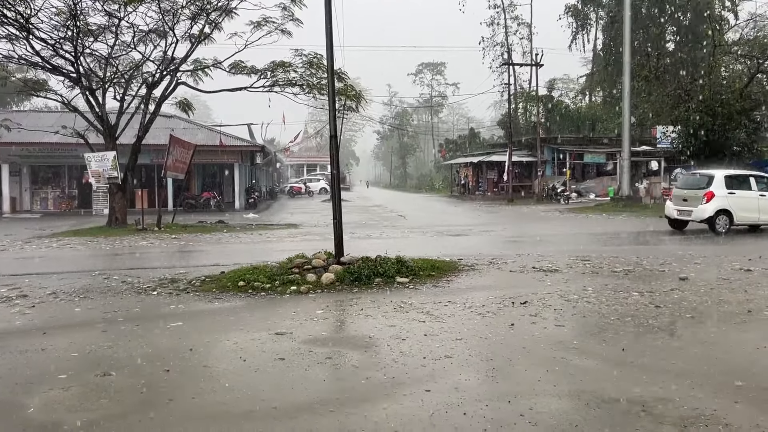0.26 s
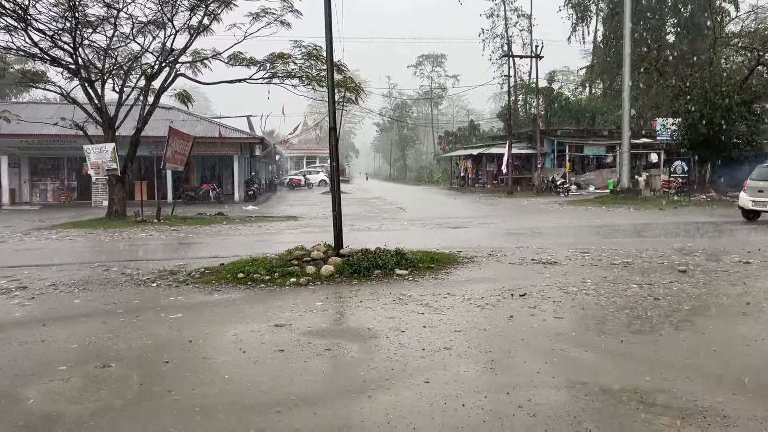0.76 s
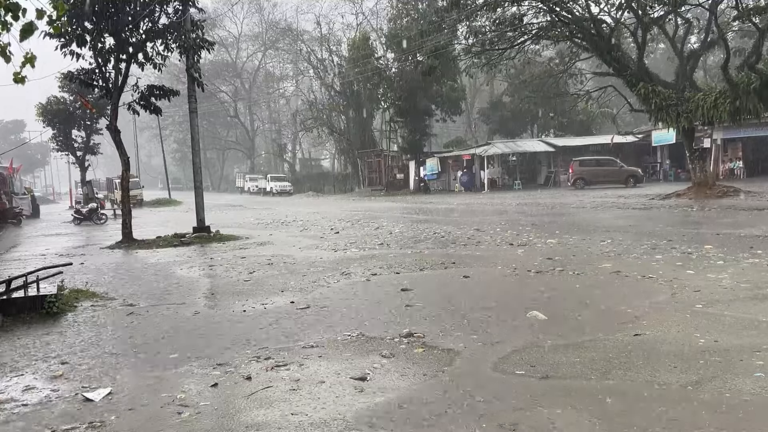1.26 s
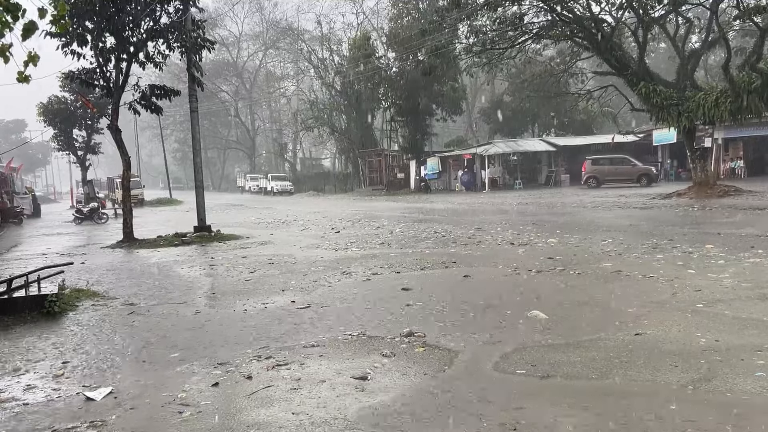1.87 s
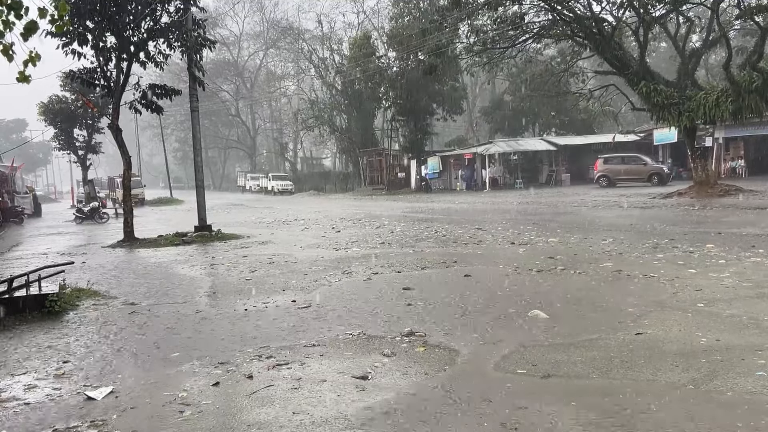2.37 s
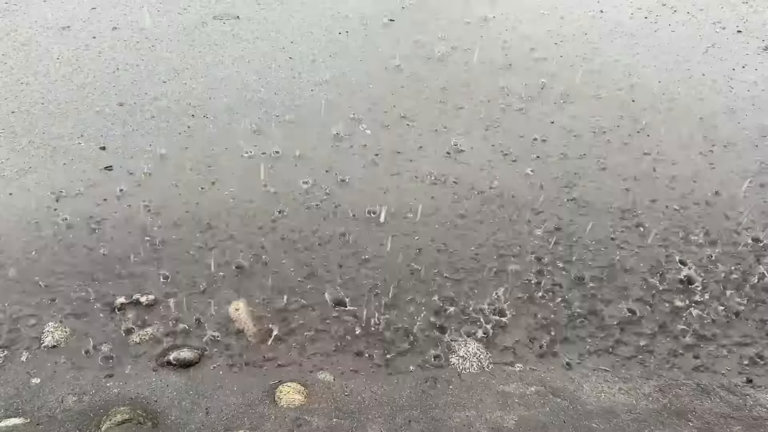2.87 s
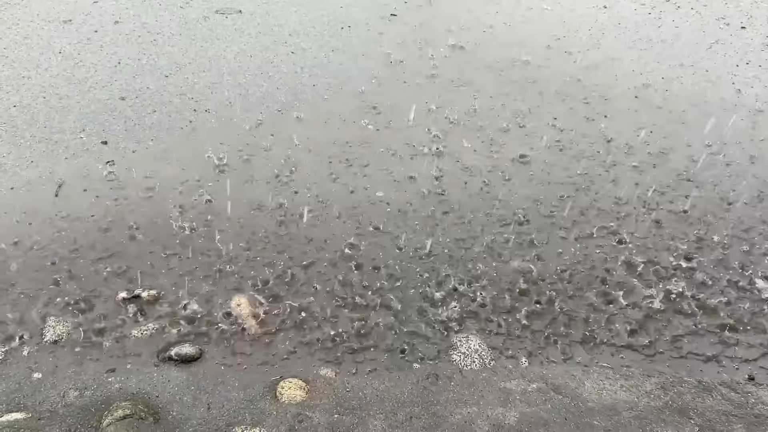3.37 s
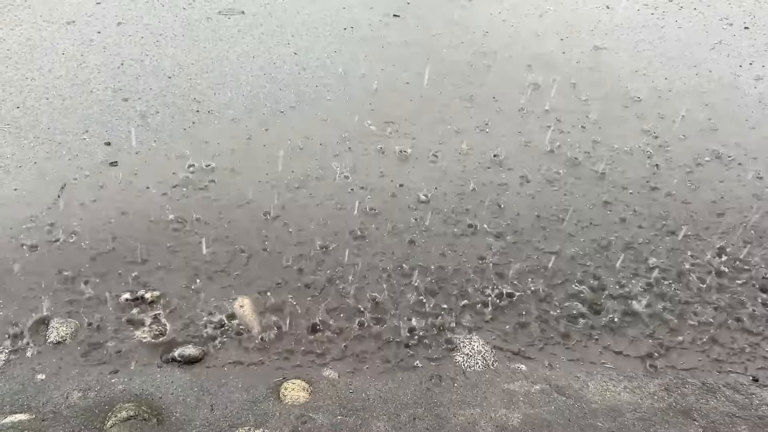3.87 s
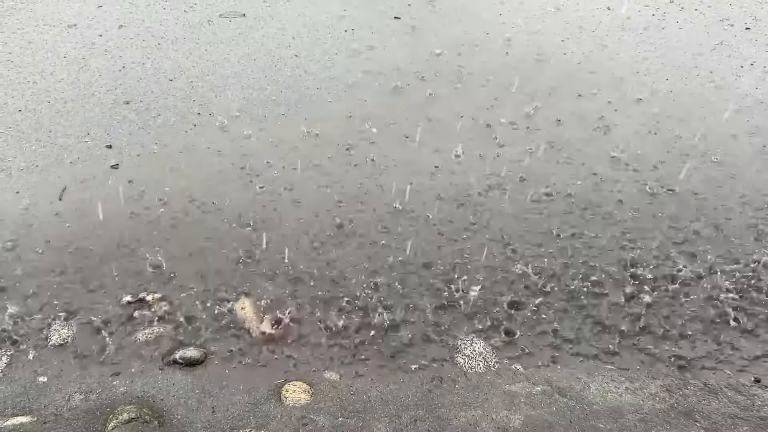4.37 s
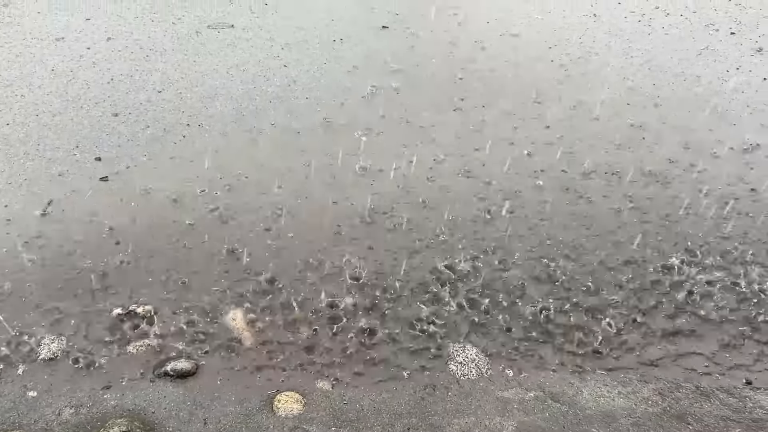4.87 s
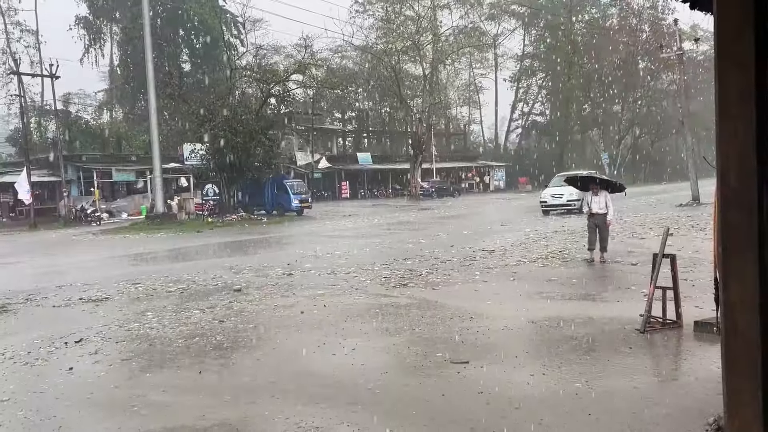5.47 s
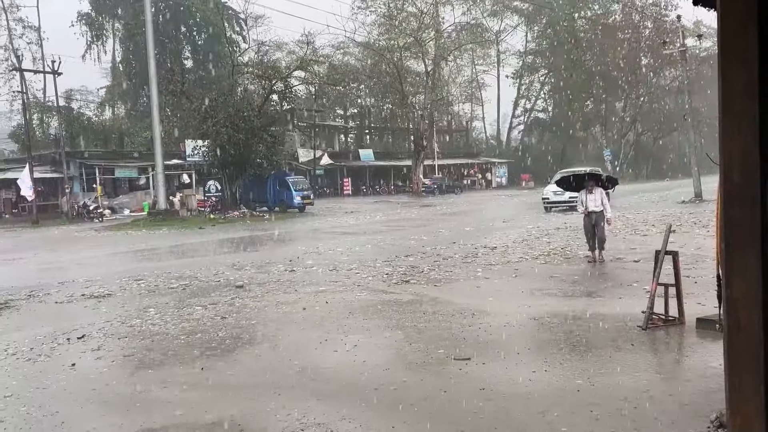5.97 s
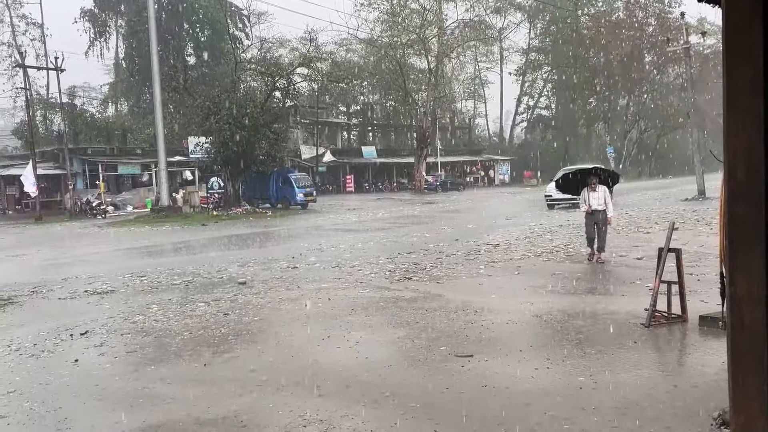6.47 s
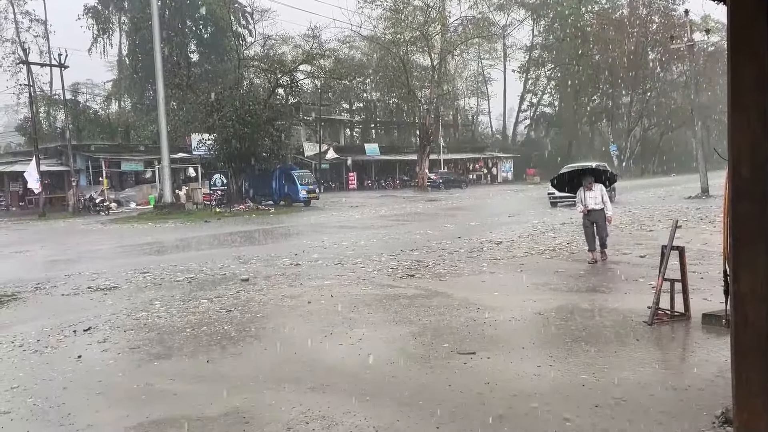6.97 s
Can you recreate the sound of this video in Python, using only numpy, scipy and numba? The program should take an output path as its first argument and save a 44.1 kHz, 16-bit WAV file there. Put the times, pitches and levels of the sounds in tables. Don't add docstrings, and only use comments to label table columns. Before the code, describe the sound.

Heavy rain pours steadily onto a flooded road, with bubbling puddles, sharp drop ticks, low wind thumps and a faint late brake squeal.

```python
import sys
import numpy as np
from scipy import signal
from scipy.fft import rfft, irfft
from scipy.io import wavfile
from scipy.ndimage import uniform_filter1d, map_coordinates
from numba import njit

SR = 44100
rng = np.random.default_rng(int(sys.argv[2]) if len(sys.argv) > 2 else 0)


def field_ratio(decibels):
    return 10 ** (np.asarray(decibels, dtype=float) / 20)


def bounce(signal):
    frames = np.transpose(np.atleast_2d(signal))
    limited = np.clip(frames, -1, 1)
    pcm = np.round(limited * 32767).astype(np.int16)
    wavfile.write(sys.argv[1], SR, pcm)


N = 317520
TIME_S, BIN_HZ = np.arange(N) / SR, np.arange(N // 2 + 1) * SR / N

# [t/s, level/dB]
DOWNPOUR = [(0.0, -22), (0.87, -23), (0.93, -22), (1.8, -23.5), (2.89, -23.5), (2.95, -22), (3.19, -21),
            (3.65, -21), (3.85, -22.5), (4.43, -23), (4.78, -21), (4.94, -22), (5.0, -25), (5.46, -23),
            (5.83, -23), (6.37, -21), (6.74, -22), (7.2, -23)]
# [f/Hz, density/dB per Hz]
WASH_COLOUR = [(70, -16), (140, 0), (230, -1), (420, 1.5), (600, -2), (860, 1), (1200, -1), (1650, -4),
               (2400, -9.8), (4800, -14.5), (7000, -18.5), (11500, -19.5), (15200, -20.5), (15900, -20.5)]
SHOT_STARTS_S = [
    .8784,
    2.8983,
    4.9465,
]
# [low roar/dB, spray/dB, extra rain on the right/dB, breeze/dB, puddle bubbles/dB]
SHOTS = [
    (0.2, 0.1, -1.4, -33, 0.1),
    (0.3, -0.4, -0.8, -32, -0.6),
    (0.1, 0.1, -0.7, -33, 0.9),
    (-0.8, 0.1, -1.3, -37.5, -0.3),
]
# [f/Hz, density/dB per Hz]
WIND_COLOUR = [(15, -42), (25, -28), (48, -1), (70, 1.5), (110, -3.5), (200, -15.5), (400, -31.5)]
# [t/s, peak/dB, f/Hz, gust fall of 20 dB/s]
KNOCKS = [(0.2, -24, 60, .1), (0.35, -24, 55, .15), (0.51, -23, 59.2, .1), (0.69, -25, 60, .4),
          (0.947, -24, 91.5, .2), (1.06, -24, 65, .2), (1.12, -18, 66, .2), (1.246, -20, 83.4, .1),
          (1.458, -17, 75.4, .17), (1.608, -14, 74.0, .5), (1.934, -14.5, 75.4, .1),
          (2.168, -15.5, 91.5, .08), (2.33, -24, 70, .6), (2.698, -15.5, 83.4, .25), (2.865, -16, 67.3, .2),
          (3.035, -21, 99.6, .2), (3.035, -16, 59.2, .4), (3.518, -19, 94.2, .25), (3.696, -15, 56.5, .14),
          (3.856, -21, 53.8, .13), (4.066, -16, 78.1, .25), (4.2, -15, 66, .15), (4.606, -21, 88.8, .25),
          (4.84, -15, 140, .03), (4.853, -10, 75, .03), (5.36, -29, 70, .1), (5.65, -28, 60, .15),
          (5.874, -27, 56.5, .2), (6.25, -31, 78.1, .4), (6.55, -25, 53.8, .5), (6.729, -17, 56.5, .15),
          (6.834, -26, 70.4, .2), (6.95, -27, 75, .5)]
# [t/s, peak/dB, f/Hz]
PLOPS = [(0.008, -13, 4200), (0.1032, -17, 2780), (0.1271, -16, 4020), (0.168, -16, 4300),
         (0.28, -16, 5000), (0.386, -15, 4650), (0.1605, -13, 4080), (0.7692, -18, 2500),
         (0.8385, -15, 4490), (0.8734, -18, 2740), (0.8999, -24, 2520), (0.9093, -19, 2790),
         (1.8597, -12, 3940), (1.942, -17, 2650), (2.0742, -18, 2300), (2.0882, -18, 3190),
         (2.2223, -18, 4180), (2.4803, -18, 2990), (2.5326, -16, 3040), (2.6688, -21, 4600),
         (2.829, -17, 2520), (2.9248, -21, 2510), (2.9647, -15, 2570), (3.0195, -15, 3240),
         (3.1068, -18, 3510), (3.1502, -18, 3980), (3.277, -17, 3630), (3.3199, -18, 3590),
         (3.3982, -17, 2770), (3.4291, -16, 2780), (3.5159, -17, 2320), (3.6636, -16, 3120),
         (3.7873, -18, 2830), (3.9903, -18, 2300), (4.1654, -18, 2540), (4.2143, -18, 2470),
         (4.3086, -16, 2420), (4.5291, -16, 3290), (4.6159, -16, 2850), (4.6833, -19, 2300),
         (4.7047, -16, 4790), (4.9257, -17, 3030), (4.9741, -21, 2820), (4.9921, -19, 2310),
         (5.1502, -19, 2320), (5.1976, -17, 3550), (5.2305, -15, 4550), (5.3388, -15, 4160),
         (5.5707, -16, 3040), (5.7813, -18, 2700), (5.8017, -18, 3920), (5.8346, -18, 2560),
         (6.0516, -17, 4760), (6.11, -17, 2510), (6.3165, -14, 3080), (6.6568, -17, 2450),
         (6.7501, -18, 2810), (7.0319, -19, 3190)]
# [t/s, peak/dB, f/Hz]
BIG_BUBBLES = [(0.21, -11, 837), (0.394, -12, 877), (0.5, -13, 980), (0.686, -11, 756), (0.854, -9, 1090),
               (0.896, -16, 681), (0.925, -13, 1280), (1.27, -11, 1240), (1.292, -13, 1500),
               (1.54, -11, 1210), (2.193, -12, 802), (2.223, -11, 1120), (2.272, -12, 1150),
               (2.689, -13, 926), (2.926, -14, 974), (3.105, -9, 1000), (3.311, -10, 1570),
               (3.337, -8, 1050), (3.386, -11, 867), (3.446, -10, 770), (3.569, -8, 1050),
               (3.593, -10, 641), (3.725, -11, 1020), (4.107, -11, 1530), (4.127, -11, 888),
               (4.434, -12, 1080), (4.599, -12, 1140), (4.752, -10, 886), (4.773, -10, 945),
               (4.795, -9, 738), (4.925, -9, 845), (5.238, -13, 875), (5.431, -12, 945), (5.486, -11, 606),
               (5.779, -11, 1010), (5.892, -12, 724), (5.935, -10, 985), (6.01, -11, 977),
               (6.054, -12, 939), (6.086, -12, 842), (6.485, -11, 834), (6.57, -12, 875),
               (6.801, -14, 1050), (6.989, -10, 1010), (7.024, -11, 781)]
# [t/s, peak/dB, f/Hz]
MID_BUBBLES = [(0.157, -17, 1610), (0.5596, -16, 2120), (0.7906, -19, 1550), (0.9198, -21, 1600),
               (0.9557, -18, 1680), (1.1463, -19, 1710), (1.1727, -19, 1720), (1.2585, -17, 2070),
               (1.286, -20, 1990), (1.3179, -17, 1760), (1.3718, -18, 1690), (1.5369, -19, 1930),
               (1.6407, -20, 1880), (1.8981, -19, 1640), (2.0108, -19, 1680), (2.0353, -19, 1570),
               (2.0777, -19, 1570), (2.1939, -20, 1650), (2.5875, -20, 1660), (2.7935, -18, 1730),
               (2.9302, -21, 1550), (2.9612, -17, 1780), (3.0854, -16, 1660), (3.1672, -17, 1870),
               (3.4151, -18, 1620), (3.473, -17, 1590), (3.5428, -18, 1810), (3.9908, -17, 2140),
               (4.2093, -21, 1770), (4.6613, -16, 1560), (4.7057, -17, 1630), (4.814, -15, 1690),
               (4.9616, -22, 1550), (5.8167, -19, 1630), (5.8561, -19, 1710), (5.895, -18, 1800),
               (5.9818, -16, 1570), (6.0307, -18, 1820), (6.2447, -16, 1570), (6.3295, -16, 1560),
               (6.4418, -19, 1630), (6.544, -18, 1940), (6.6767, -16, 1670), (6.9686, -16, 1620),
               (7.1207, -20, 1840)]
# [t/s, peak/dB, f/Hz]
SMALL_BUBBLES = [(0.3132, -23, 5110), (0.5551, -24, 4820), (0.7936, -23, 4710), (0.9009, -27, 5190),
                 (1.034, -26, 4990), (1.0635, -20, 5000), (1.0839, -24, 4930), (1.3673, -26, 6320),
                 (1.5818, -25, 4810), (1.6686, -24, 6270), (1.8597, -19, 4840), (1.942, -23, 4840),
                 (2.0083, -18, 5860), (2.368, -26, 4780), (2.5331, -22, 5180), (2.6015, -21, 4770),
                 (2.6688, -18, 4940), (2.7911, -22, 4880), (2.829, -23, 5030), (2.8789, -22, 4830),
                 (2.9208, -26, 5120), (3.1477, -20, 4990), (3.2765, -24, 5090), (3.5533, -23, 6060),
                 (3.9908, -23, 6310), (4.0926, -22, 4720), (4.2772, -25, 4790), (4.372, -23, 5170),
                 (4.7047, -22, 4790), (4.7875, -23, 5070), (4.9781, -26, 4940), (5.0943, -24, 4900),
                 (5.1791, -25, 5070), (5.23, -19, 4740), (5.7414, -20, 5430), (5.7813, -23, 6340),
                 (5.8017, -24, 4850), (5.9668, -24, 4830), (6.0521, -22, 4760), (6.0871, -22, 5060),
                 (6.1155, -24, 4910), (6.3165, -22, 4950), (6.3779, -25, 6360), (6.6174, -24, 4730)]
# [t/s, peak/dB, f/Hz]
TICKS = [(0.1082, -17, 7070), (0.404, -17, 11800), (0.8974, -27, 12400), (0.9073, -22, 6770),
         (1.0635, -13, 7260), (1.1513, -15, 6530), (1.2027, -19, 6820), (1.2296, -11, 6570),
         (1.3039, -18, 7460), (1.3199, -18, 7330), (1.6746, -20, 6520), (2.0078, -14, 6540),
         (2.2298, -19, 6940), (2.5037, -14, 7210), (2.7706, -17, 7400), (2.9178, -25, 11500),
         (2.9297, -20, 7400), (2.9746, -14, 7290), (3.0794, -15, 6980), (3.1477, -13, 7460),
         (3.3179, -14, 6700), (3.3568, -18, 8110), (3.3977, -13, 12700), (3.467, -14, 12900),
         (3.6082, -16, 13700), (3.6391, -19, 7060), (3.8467, -11, 13400), (3.8631, -13, 13100),
         (3.9, -14, 7060), (4.0083, -11, 7650), (4.0627, -12, 11500), (4.1679, -11, 12700),
         (4.4358, -18, 13200), (4.5166, -19, 7390), (4.56, -16, 7060), (4.6029, -17, 8310),
         (4.6508, -14, 6980), (4.7406, -18, 7330), (4.8319, -14, 6610), (4.8638, -13, 13000),
         (5.0225, -20, 6600), (5.0774, -16, 7960), (5.2195, -19, 6540), (5.2385, -19, 6650),
         (5.3448, -16, 6800), (5.5169, -12, 12600), (5.6466, -15, 12300), (5.6905, -16, 7180),
         (5.7414, -14, 6730), (5.7808, -19, 7160), (5.8726, -18, 7170), (5.902, -16, 12600),
         (6.116, -19, 7850), (6.2986, -15, 6520), (6.3485, -13, 7010), (6.3784, -18, 7170),
         (6.4418, -18, 6540), (6.5595, -16, 7250), (6.6912, -16, 8400), (6.7186, -15, 8010)]
# [t/s, peak/dB, f/Hz, length/cycles]
DRIPS = [
    (1.1522, -9, 14600, 8),
    (1.1522, -15, 7800, 6),
    (2.0088, -10, 14400, 12),
    (2.0088, -8, 11900, 10),
    (6.874, -11, 9000, 2),
    (7.1848, -11, 11000, 3),
]
# [t/s, f/Hz, level/dB]
SQUEAL = [
    (6.645, 8700, -44),
    (6.66, 8700, -32),
    (6.695, 8700, -30),
    (6.725, 8050, -31),
    (6.76, 7150, -33),
    (6.785, 6600, -35),
    (6.85, 6400, -32),
    (6.96, 6400, -34),
    (7.2, 6200, -32.5),
]
# [f/Hz, width/Hz, gain/dB]
DISC_MODES = [(8850, 60, 7), (8570, 60, 6), (8050, 55, 10), (7620, 80, 1), (7200, 55, 9), (6800, 60, 6),
              (6490, 45, 10), (6230, 45, 9), (5850, 60, 7), (5550, 70, 4)]
# [t/s, peak/dB, f/Hz, length/cycles]
BURST = [(6.7979, -9, 14300, 16), (6.798, -7, 8600, 18), (6.7984, -8, 7300, 16), (6.798, -6, 15300, 16),
         (6.7982, -9, 16200, 16), (6.7985, -6, 10500, 14), (6.7984, -14, 12600, 14),
         (6.7997, -11, 7800, 12), (6.7984, -10, 6400, 12), (6.7988, -9, 5500, 12), (6.7996, -11, 5700, 12),
         (6.8003, -14, 6900, 14), (6.8007, -15, 3900, 8), (6.8016, -9, 3750, 9), (6.8024, -22, 1000, 2)]
# [f/Hz, gain/dB, likeness/0-1, phase lead/rad]
PORTS = [(60, -.5, 0.935, 0.032), (260, -1.3, 0.89, 0), (620, -0.6, 0.27, -0.27), (975, 0.5, .28, -0.31),
         (1300, 3, 0.16, 0.15), (1560, 2.5, 0, 1.8), (1700, -3, 0.67, -.3), (2320, -0.5, 0.52, -0.51),
         (3400, -1.1, 0.34, -0.82), (4300, -1, 0.46, -0.65), (5300, 0, 0.22, .3), (5570, -1.5, .3, 1.7),
         (6500, 0.4, .6, 0.56), (7150, -0.6, 0.86, 0.35)]
# [f/Hz, likeness/0-1, lead/half turns]
TREBLE = [(8500, .87, .5), (9300, .9, .88), (9650, .97, 1), (10200, .98, 1), (10600, .9, 1.18),
          (12250, .86, 1.8), (12500, .9, 1.95), (13100, .93, 2), (13650, .9, 2.06), (13850, .86, 2.3),
          (15120, .86, 2.8), (15350, .985, 3)]

ROAR_FOLLOWS, SPRAY_FOLLOWS = .3, .6
GUST_DB, GUST_RISE_S, GUST_LAG_S = -8, .03, .04
BREEZE_WOBBLE_DB = 4.
CLEAN_HZ, HOARSE_HZ, HOARSE_AT_S, HOARSE_S = 700, 900, 6.86, .02
JUDDER_HZ, JUDDER_DB = 90, 2.2
UNDER_SHARE, UNDER_DB = .91, -4
OCTAVE_SHARE, OCTAVE_SPREAD = 1.95, 3.
OCTAVE_BITE_DB, OCTAVE_HOLD_DB, SINK_AT_S, SINK_S = -26, 5, 6.732, .024
DISC_DB, BETWEEN_DB = -4, -7
TOP_HZ, BURST_TOP_HZ, BASS_HZ = 15810, 16600, 43
FADE_S, FADE_FROM, FADE_BEND = .047, .055, 1.2


def level(x, db):
    return x * field_ratio(db) / np.sqrt(np.mean(x ** 2))


def along_time(table):
    s, *columns = np.transpose(table)
    return [np.interp(TIME_S, s, c) for c in columns]


def along_hz(table):
    hz, *columns = np.transpose(table)
    return [np.interp(np.log(BIN_HZ + 1), np.log(hz), c) for c in columns]


def per_shot(table):
    return np.transpose(table)[:, np.searchsorted(SHOT_STARTS_S, TIME_S)]


def walk(rate_hz):
    hold = int(SR / rate_hz)
    steps = np.repeat(rng.standard_normal(N // hold + 1), hold)
    return 1.28 * uniform_filter1d(uniform_filter1d(steps, hold), hold)[:N]


def ease(at_s, over_s):
    return .5 + .5 * np.tanh((TIME_S - at_s) / over_s / 2)


def below(x, hz):
    return irfft(rfft(x) * np.clip((hz - BIN_HZ) / 40 + 1, 0, 1), N)


@njit
def grains(s, size, hz, cycles, glide):
    out = np.zeros(N)
    for k in range(len(s)):
        n = int(cycles[k] * SR / hz[k] * 2) + 2
        z, i = size[k] + 0j, int(s[k] * SR)
        for j in range(min(n, N - i)):
            out[i + j] += z.imag
            z *= np.exp(2j * np.pi * hz[k] * (1 + glide * j / n) / SR - 5.76 / n)
    return out


def ring(table, delay_s, trim_db, cycles, glide):
    s, db, hz = np.transpose(table)
    return grains(s + delay_s, field_ratio(db + trim_db), hz, cycles + 0 * s, glide)


def scatter(count, low_hz, high_hz, cycles, spread_db, glide):
    when, pitch, big = rng.random((count, 3)).T
    hz = low_hz * (high_hz / low_hz) ** pitch
    size = field_ratio(-spread_db * np.log(big + .01))
    return grains(when * N / SR, size, hz, cycles + 0 * hz, glide)


def rain(wash_db, roar_db, spray_db, puddle_db, swell, spatter):
    far = rfft(rng.standard_normal(N)) * field_ratio(along_hz(WASH_COLOUR)[0])
    middle = far[(BIN_HZ > 500) & (BIN_HZ < 2000)]
    far /= np.sqrt(2 * np.sum(np.abs(middle) ** 2)) / N
    roar_swing_db, spray_swing_db = roar_db - roar_db.mean(), spray_db - spray_db.mean()
    patter = walk(11)
    wash = 0
    for centre_hz in 70 * 2 ** np.arange(0, 8.5, .5):
        share = np.clip(1 - 2 * np.abs(np.log2((BIN_HZ + 1) / centre_hz)), 0, 1)
        tilt = np.interp(np.log2(centre_hz / 1000), [-1.5, -.5, .5, 1.5], [-1, 0, 0, 1])
        bass, treble = max(-tilt, 0), max(tilt, 0)
        band_db = bass * roar_swing_db + treble * spray_swing_db + 0.59 * swell
        band_db = band_db + treble * (0.85 * spatter + 1.0 * walk(34))
        band_db = band_db + 0.43 * walk(9) + 0.6 * (1 - abs(tilt)) * patter
        wash = wash + irfft(far * share, N) * field_ratio(band_db)
    crackle = scatter(count=16000, low_hz=4800, high_hz=16000, cycles=3.0, spread_db=3.2, glide=0.)
    bubbles = scatter(count=3000, low_hz=500, high_hz=2300, cycles=9.0, spread_db=3.2, glide=0.23)
    near = level(crackle, -13.7) * field_ratio(spray_swing_db) + level(bubbles, -8.5) * field_ratio(puddle_db)
    return field_ratio(wash_db) * (wash + near)


def fizz(wash_db):
    bubbles = scatter(count=1500, low_hz=1800, high_hz=7500, cycles=14.0, spread_db=3.8, glide=0.12)
    return below(level(bubbles, -16.5) * field_ratio(wash_db), TOP_HZ)


def wind(breeze_db):
    power = field_ratio(breeze_db + BREEZE_WOBBLE_DB * walk(14)) ** 2
    for s, db, _, fall_s in KNOCKS:
        since_s = TIME_S - s - GUST_LAG_S
        loss_db = 20 * np.maximum(since_s / fall_s, -since_s / GUST_RISE_S)
        power = power + field_ratio(db + GUST_DB - loss_db) ** 2
    noise = irfft(rfft(rng.standard_normal(N)) * field_ratio(along_hz(WIND_COLOUR)[0]), N)
    out = level(noise, -0.65) * np.sqrt(power)
    for s, db, hz, _ in KNOCKS:
        i = int(s * SR)
        since_s = TIME_S[i:][:SR // 8] - s - .024
        wave = np.sin(2 * np.pi * 0.88 * hz * since_s * (1 - 21.0 * since_s))
        out[i:][:SR // 8] += field_ratio(db - 2.2) * wave * np.exp(-(since_s / .013) ** 2)
    return out


def puddle_plops():
    plops = ring(PLOPS, delay_s=0.00121, trim_db=-1.6, cycles=8.5, glide=0.14)
    plops += ring(BIG_BUBBLES, delay_s=0.0013, trim_db=-4.5, cycles=11.0, glide=0.12)
    return plops + ring([*SMALL_BUBBLES, *MID_BUBBLES], delay_s=0.001, trim_db=-3.5, cycles=12.0, glide=0.1)


def road_ticks():
    s, db, _ = np.transpose(TICKS)
    snap = grains(s + 0.0016, field_ratio(db + 8.0), 13500 + 0 * s, 2.2 + 0 * s, 0.)
    return ring(TICKS, delay_s=0.0011, trim_db=1.5, cycles=4.5, glide=-.2) + snap


def drips():
    s, db, hz, cycles = np.transpose(DRIPS)
    return grains(s, field_ratio(db), hz, cycles, -.05)


def brake():
    hz, squeal_db = along_time(SQUEAL)
    hz = hz + JUDDER_HZ * walk(45)
    hoarse = ease(HOARSE_AT_S, HOARSE_S)
    width_hz = CLEAN_HZ + (HOARSE_HZ - CLEAN_HZ) * hoarse
    octave_db = OCTAVE_BITE_DB + (OCTAVE_HOLD_DB - OCTAVE_BITE_DB) * ease(SINK_AT_S, SINK_S)
    under_db = UNDER_DB - 30 * (1 - hoarse)
    turns = np.cumsum(hz) / SR
    voices = (1, 0, 1.), (UNDER_SHARE, under_db, .8), (OCTAVE_SHARE, octave_db, OCTAVE_SPREAD)
    out = 0
    for order, gain_db, spread in voices:
        steps = np.cumsum(spread * width_hz) / SR
        slip = rng.standard_normal((2, 40000))
        real, imag = (map_coordinates(part, [steps], order=3) for part in slip)
        tone = ((real + 1j * imag) * np.exp(2j * np.pi * order * turns)).real
        out = out + field_ratio(squeal_db + gain_db) * tone
    out = out * field_ratio(JUDDER_DB * walk(60)) * (TIME_S > SQUEAL[0][0])
    modes = sum(field_ratio(db + DISC_DB) / (1 + 2j * (BIN_HZ - f) / width) for f, width, db in DISC_MODES)
    return irfft((field_ratio(BETWEEN_DB) + modes) * rfft(out), N)


def big_drop():
    s, db, hz, cycles = np.transpose(BURST)
    return grains(s, field_ratio(db), hz, cycles, -.05)


def scene():
    wash_db, = along_time(DOWNPOUR)
    roar_db, spray_db, aside_db, breeze_db, puddle_db = per_shot(SHOTS)
    roar_db = roar_db + (ROAR_FOLLOWS - 1) * wash_db
    spray_db = spray_db + (SPRAY_FOLLOWS - 1) * wash_db
    swell = 0.4 * walk(13) + 0.7 * walk(30)
    bursts = walk(36)
    spatter = 0.95 * (bursts - uniform_filter1d(bursts, size=SR // 6))

    def field():
        broad = rain(wash_db, roar_db, spray_db, puddle_db, swell, spatter) + wind(breeze_db)
        return below(broad, TOP_HZ) + fizz(wash_db)

    one, other = field(), field()
    close = below(puddle_plops() + road_ticks() + drips() + brake(), TOP_HZ) + big_drop()
    treble = [(hz, 0, like, np.pi * half_turns) for hz, like, half_turns in TREBLE]
    gain_db, likeness, lead_rad = along_hz([*PORTS, *treble])
    likeness = np.clip(likeness, 0, 1)
    shared = (likeness * rfft(one) + rfft(close)) * np.exp(1j * lead_rad)
    apart = np.sqrt(1 - likeness ** 2) * rfft(other * field_ratio(aside_db))
    right = irfft(field_ratio(gain_db) * (shared + apart), N)
    return np.array([one + close, right]) * field_ratio(2.25)


def roll_off(x):
    return signal.sosfilt(signal.butter(12, 16500, fs=SR, output="sos"), x)


def record(dry):
    since_s = TIME_S - np.array(SHOT_STARTS_S)[:, None]
    rise = np.clip(FADE_FROM + (np.abs(since_s) / FADE_S) ** FADE_BEND, 0, 1)
    fade = np.where(since_s < 0, 1, rise).prod(axis=0)
    top_cut = np.clip((BURST_TOP_HZ - BIN_HZ) / 100 + 1, 0, 1)
    bass_cut = BIN_HZ ** 3 / np.hypot(BIN_HZ ** 3, BASS_HZ ** 3)
    heard = irfft(rfft(dry) * top_cut * bass_cut, N)
    return roll_off(np.clip(heard * fade, -1, 1))


dry = scene()
out = record(dry)
bounce(out)
```